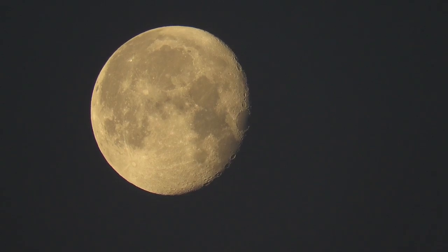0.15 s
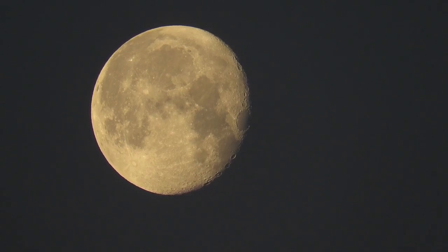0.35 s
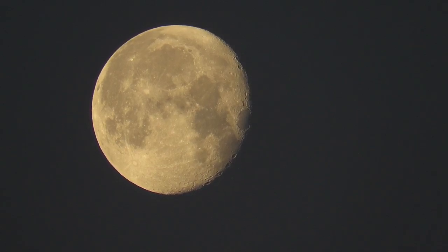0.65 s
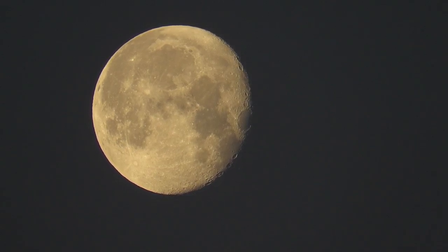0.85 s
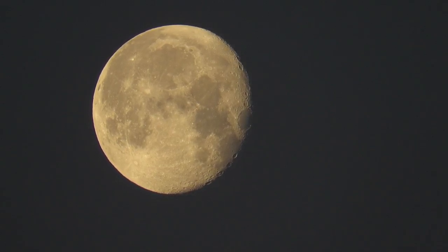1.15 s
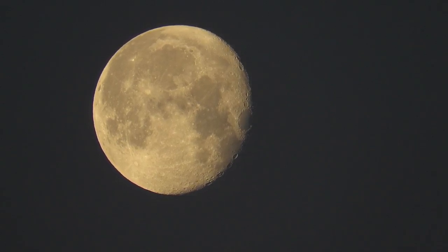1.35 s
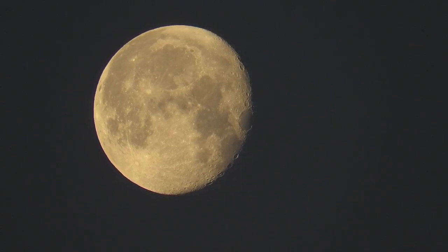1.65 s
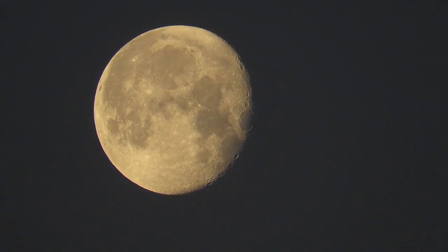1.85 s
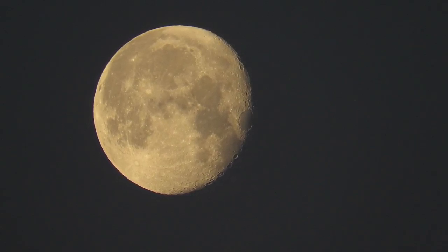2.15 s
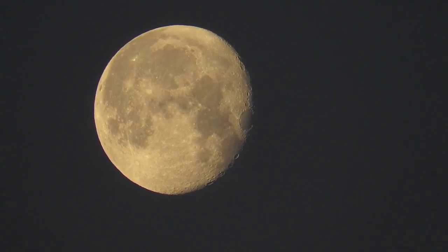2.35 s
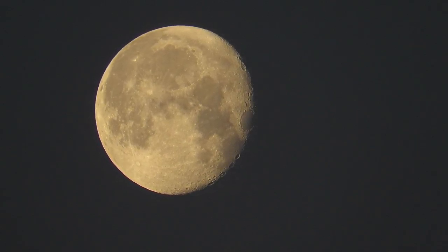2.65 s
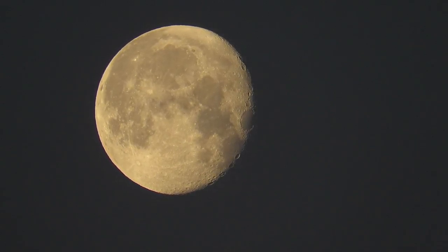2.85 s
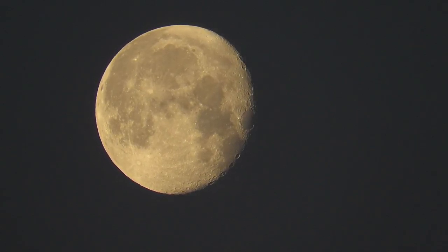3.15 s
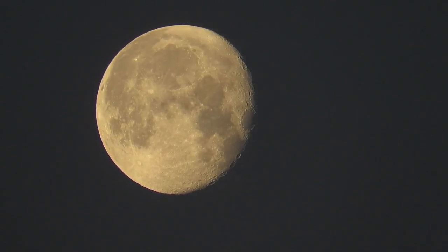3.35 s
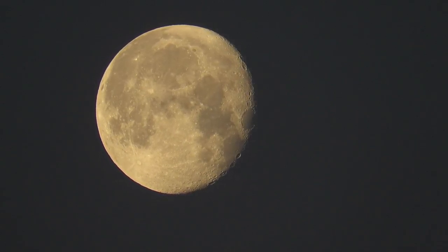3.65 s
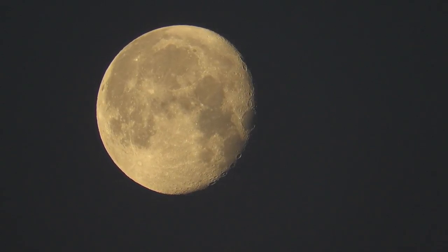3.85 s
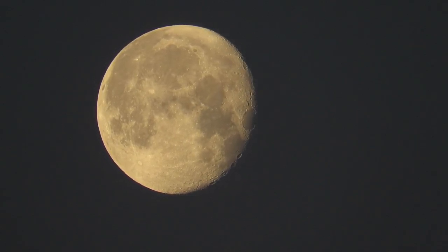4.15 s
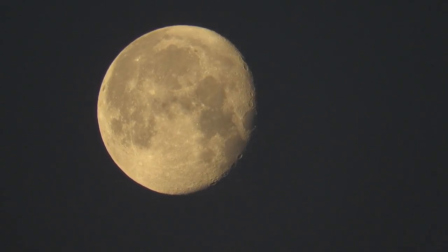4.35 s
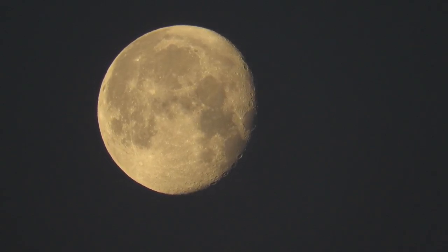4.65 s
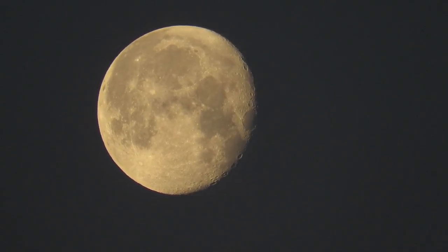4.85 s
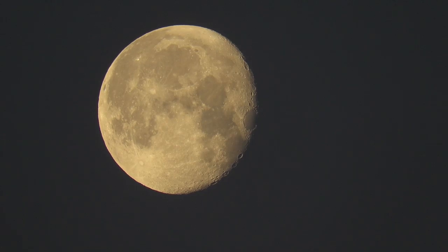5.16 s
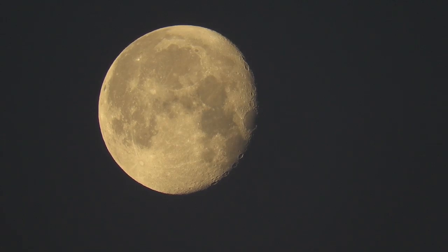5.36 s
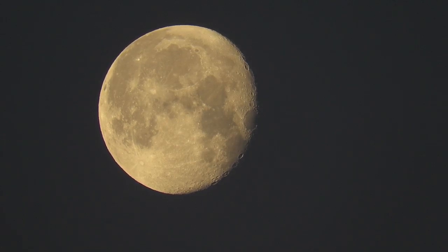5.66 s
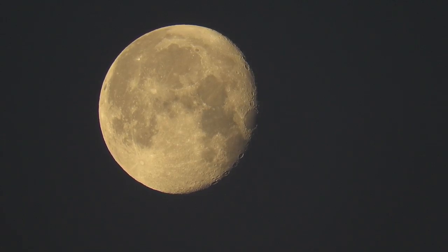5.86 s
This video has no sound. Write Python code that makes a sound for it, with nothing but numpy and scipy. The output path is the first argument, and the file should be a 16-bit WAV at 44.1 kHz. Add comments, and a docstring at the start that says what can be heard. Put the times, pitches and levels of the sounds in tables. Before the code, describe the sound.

A flying gull gives five quick three-note cries, echoed off house fronts along a street, over a steady low town rumble with one faint knock.

```python
"""Above the steady rumble of a town and its humming fans, a gull flies over a street and gives five
three-note cries, each note a stack of gliding overtones. After each cry a house front throws it back,
mostly later, higher and from the other side, and the street rings on with scattered reflections.
Between the fourth and fifth cry comes one distant knock, a short burst of noise.
All is heard through a small stereo microphone and opens after a moment of silence."""
import sys
import numpy as np
from scipy import signal
from scipy.fft import rfft, irfft
from scipy.io import wavfile
from scipy.ndimage import uniform_filter1d

SR = 44100
rng = np.random.default_rng(int(sys.argv[2]) if len(sys.argv) > 2 else 0)


def wrap_up_sound(samples):
    """Save the sound to the file named by the first command line argument, as 16-bit audio."""
    columns = np.atleast_2d(samples).T
    # keep every value between -1 and 1, then stretch to whole-number steps
    tamed = np.clip(columns, -1, 1)
    steps = np.round(tamed * 32767).astype(np.int16)
    wavfile.write(sys.argv[1], SR, steps)


N = 264908
NOTES_PER_CRY = 3

# The notes of the gull's cries, one row a note: kind, start t/s, length t/s, first f/Hz, last f/Hz,
# arch f/Hz, swell and fade of overtone 2 (dB per s),
# then for each of overtones 2, 3, 4: loudest level/dB and its moment (0-1 of the note)
CRY_NOTES = [ ("rise", .672, .048, 1190, 1330, 11, 380, 300, -48, .8, -52.5, .5, -61, .85),
             ("high", .715, .059, 1575, 1465, 10, 550, 150, -43.5, .6, -80, .5, -61, .45),
             ("drop", .772, .066, 1185, 1065, 10, 130, 400, -42.5, .8, -61, .3, -64, .1),
             ("rise", 1.497, .058, 1175, 1320, 25, 200, 500, -47, .85, -45, .15, -67, .15),
             ("high", 1.538, .069, 1530, 1385, 85, 300, 90, -46, .2, -80, .5, -69, .8),
             ("drop", 1.609, .09, 1165, 850, 85, 500, 150, -41, .1, -54, .4, -72, .2),
             ("rise", 2.54, .058, 1190, 1320, 9.5, 500, 500, -46.5, .85, -53, .65, -70, .15),
             ("high", 2.6, .035, 1557, 1455, 5, 400, 400, -57, .5, -84, .5, -66, .5),
             ("drop", 2.645, .058, 1210, 1030, 20, 250, 300, -48.5, .65, -69, .65, -76, .8),
             ("rise", 4.238, .052, 1175, 1335, 11, 400, 700, -46.5, .85, -48.5, .55, -65, .35),
             ("high", 4.284, .06, 1570, 1490, 55, 200, 150, -48, .35, -84, .5, -62, .85),
             ("drop", 4.358, .052, 1135, 990, 10, 200, 450, -39.5, .06, -58, .15, -72, .4),
             ("rise", 5.785, 0.0517, 1195, 1345, 10, 500, 600, -47.5, .82, -59, .5, -68, .7),
             ("high", 5.832, 0.042, 1620, 1510, 5, 200, 600, -56, .8, -84, .5, -69, .2),
             ("drop", 5.878, .034, 1190, 1090, 5, 300, 300, -56, .45, -64, .5, -80, .5), ]


def gain_of(db):
    """Turns decibels into a factor."""
    return 10 ** (np.asarray(db) / 20)


def evened(x):
    """Scales a signal to an average strength (rms) of 1."""
    return x / np.sqrt(np.mean(x ** 2) + 1e-20)


def smoothed_twice(x, size, axis=-1):
    """Takes a running average twice, which leaves only slow changes."""
    return uniform_filter1d(uniform_filter1d(x, size=size, axis=axis), size=size, axis=axis)


def partly_alike(first, other, likeness):
    """Pairs a signal with a second one: likeness 1 is the same, 0 unrelated, below 0 opposed."""
    return np.array([first, likeness * first + np.sqrt(1 - likeness ** 2) * other])


def read(points, hz):
    """Reads a curve between its points, on a log-frequency axis."""
    f, value = np.transpose(points)
    return np.interp(np.log(hz + 1), np.log(f + 1), value)


def add(mix, s, sound):
    """Mixes a sound in at s seconds."""
    part = mix[round(s * SR):][:len(sound)]
    part += sound[:len(part)]


def placed(x, pan_db, lead_s):
    """Makes two channels: the left louder by pan_db and earlier by lead_s."""
    side = np.array([[.5], [-.5]])
    turn = np.exp(2j * np.pi * np.fft.rfftfreq(N, 1 / SR) * lead_s * side)
    return irfft(rfft(x) * turn * gain_of(pan_db * side), N)


def note(t, hz, overtones_db, waver=0.0055, flutter_db=1.3):
    """Adds overtones on one slightly wavering pitch; each flutters in level on its own."""
    wobble = evened(uniform_filter1d(rng.standard_normal(len(t)), size=150))
    turns = np.cumsum(hz * (1 + waver * wobble)) / SR
    noise = rng.standard_normal((len(overtones_db), len(t) + 2000))
    flutter = flutter_db * evened(smoothed_twice(noise, 180))[:, 1000:-1000]
    tone = np.zeros(len(t))
    for k, db in enumerate(overtones_db):
        tone += gain_of(db + flutter[k]) * np.sin(2 * np.pi * (k + 1) * turns)
    return np.sqrt(2) * tone * signal.windows.tukey(len(t), .17)


def gull(notes, flutter_db, low_db, blur_db):
    """Glides each note over a slight arch while its overtones swell and fade; close paths make it flutter."""
    # The voice, by kind of note: overtone 1 against overtone 2 level/dB, overtone 5 against 4 level/dB,
    # loudest moment of overtones 1 and 5 (0-1), skew of the arch (under 1 tops out early)
    voice = {"rise": (-5, -18, .35, 0, .65), "high": (-21, -22, .5, 0, 1.05),
             "drop": (-15.5, -3, 1, .7, 1.2)}
    # Higher overtones swell and fade faster, one value for each of overtones 1 to 5: (factor)
    steeper = [.6, 1, 1.1, 1.4, 1.5]
    out = np.zeros(N)
    for row, chest_db in zip(notes, low_db):
        kind, start, length, first_hz, last_hz, arch_hz, swell, fade, *overtones = row
        first_db, fifth_db, first, fifth, skew = voice[kind]
        (second_db, third_db, fourth_db), moments = overtones[::2], overtones[1::2]
        t = np.arange(0, length, 1 / SR)
        u = t / length
        hz = first_hz + (last_hz - first_hz) * u + arch_hz * np.sin(np.pi * u ** skew)
        tops = [second_db + first_db + chest_db, second_db, third_db, fourth_db, fourth_db + fifth_db]
        levels = []
        for top, moment, k in zip(tops, (first, *moments, fifth), steeper):
            late = t - length * moment  # below 0 while the overtone still swells
            levels.append(top - k * np.maximum(fade * late, -swell * late))
        add(out, start, note(t, hz, levels, flutter_db=flutter_db))
    # nearby roofs blur the edges: sparse reflections that die away
    lag = np.arange(SR // 12) / SR
    hits = rng.random(len(lag)) < .05
    roofs = gain_of(blur_db - 60 * lag / 0.18) * rng.standard_normal(len(lag)) * hits
    return out + signal.oaconvolve(out, roofs)[:N]


def answer(delay_s, fade_db, clumps_db=2.8, uneven_db=2.0):
    """Scatters sparse reflections of uneven size in clumps, mostly shared by both channels."""
    # The street's answer: t/s after the return from the house front, level/dB
    street_curve = [(-.2, -15), (-.1, -10), (-.03, -6.5), (.02, -2), (.2, -3.5), (.7, -16), (1.7, -29)]
    s, db = np.transpose(street_curve)
    t = np.arange(2 * SR) / SR
    size = gain_of(uneven_db * np.minimum(rng.exponential(1, (2, len(t))), 4))
    hits = rng.random((2, len(t))) < 100 / SR  # about 100 reflections per s
    a, b = size * rng.standard_normal((2, len(t))) * hits
    clumps = evened(smoothed_twice(rng.standard_normal(len(t)), 1200))
    taps = partly_alike(a, b, 0.9)
    level = np.interp(t - delay_s, s, db, left=-200)
    taps *= gain_of(level - fade_db * t + clumps_db * clumps)
    return taps / np.sqrt(80)


def street():
    """Sends each cry to walls in its own set of places, so each has its own scattered reflections."""
    # How each cry fills the street: delay of the house front t/s, rising, high and dropping note level/dB,
    # slower fade (dB per s), spread of the returned pitches below the sharpest (factor)
    fill = [(0.2, -52.5, -52.5, -52.5, 5, 1.05), (0.18, -53, -55.5, -52.5, 3, 1.1),
            (0.17, -52.5, -56, -52, 1, 1.4), (0.09, -51.5, -53, -51.5, -2, 1.9),
            (0.13, -59, -62, -60, 0.1, 1.5)]
    # The notes as the walls hear them, one row a note: overtones 1 to 4 level/dB
    shape = [(-14, 0, -12.5, -22), (-21, 0, -51, -22), (-6, 0, -13.5, -27)]
    # Walls behind and ahead of the flying bird, those ahead ring longest: pitch (factor before the
    # spread), extra fade (dB per s, before the spread and the slower fade)
    walls = [(.96, 22), (.99, 14), (1.015, 5), (1.03, 0), (1.04, 0), (1.045, 0), (1.055, 0)]
    # Change along each note as the walls hear it: rising, high, dropping note level/dB
    lean = [4, -1, -6]
    out = np.zeros((2, N))
    sharpest = walls[-1][0]
    for k, (delay_s, *fill_db, slower_db, spread) in enumerate(fill):
        notes = CRY_NOTES[NOTES_PER_CRY * k:][:NOTES_PER_CRY]
        start = notes[0][1]
        for shift, fade_db in walls:
            cry = np.zeros(SR // 4)
            heard = sharpest - spread * (sharpest - shift)
            for row, overtones, db, lean_db in zip(notes, shape, fill_db, lean):
                _, s, length, first_hz, last_hz, arch_hz, *_ = row
                t = np.arange(0, length, 1 / SR)
                glide = np.linspace(first_hz, last_hz, len(t))
                hz = heard * (glide + arch_hz * np.sin(np.pi * t / length))
                levels = np.add.outer(overtones, db + lean_db * (t / length - .5))
                add(cry, s - start, note(t, hz, levels, waver=0.008))
            reflections = answer(delay_s, fade_db / spread - slower_db)
            add(out.T, start, signal.fftconvolve(cry[None], reflections, axes=1).T)
    return out


def knock():
    """Makes a dry crack far off: a short burst of noise and its quickly dying reflections."""
    # Colour of the knock: f/Hz, level/dB (per Hz)
    colour = [(700, -30), (1100, 0), (1560, 3.5), (2600, -5.5), (3600, -4.5), (5400, -14), (6400, -23),
              (7500, -47)]
    start_s, level_db = 4.873, -40
    t = np.arange(SR // 2) / SR
    rise = 1 - np.exp(-t / 0.0036)
    fall = gain_of(-60 * t / 0.091) + gain_of(-10.5 - 60 * t / 0.45)  # the burst, then its reflections
    hz = np.fft.rfftfreq(len(t), 1 / SR)
    spectrum = rfft(rng.standard_normal(len(t))) * gain_of(read(colour, hz))
    burst = evened(irfft(spectrum, len(t)))
    out = np.zeros(N)
    add(out, start_s, gain_of(level_db) * burst * rise * fall)
    return placed(out, 1.0, 1.5e-5)


def town():
    """Shapes noise into traffic and fans: humps and drifting patches, with small quick level changes."""
    # Basic colour of the rumble: f/Hz, level/dB (per Hz, before the whole is scaled)
    rumble = [(15, -45), (30, -45), (60, -11.5), (110, -6), (200, -5), (330, -11.5), (600, -10.5),
              (1250, -13.5), (1500, -18.5), (2200, -24), (3500, -30.5), (6000, -37.5), (10000, -44),
              (13000, -47.5), (15000, -61)]
    # Humps in the rumble: f/Hz, width f/Hz, added level/dB
    hums = [(138.3, 32, 6), (222, 29.7, 6.5), (304, 50, 5), (433, 42, 6), (752, 59, 2.5), (1105, 47, 4)]
    # Passing traffic: t/s, level/dB (only the difference from the mean counts)
    traffic = [(0.0, -50), (0.12, -48.5), (0.23, -48.5), (0.87, -49.5), (1.96, -48), (2.16, -49),
               (4.82, -48), (5.13, -46), (5.74, -47.5), (6.01, -46.5)]
    # How alike left and right are: f/Hz, likeness (-1 to 1)
    alike = [(25, 1), (60, 1), (170, 0.95), (260, 0.5), (400, -0.11), (520, 0.055), (720, 0.77),
             (950, 0.55), (1180, 0.87), (1420, 0.53), (2400, 0.24), (4600, -0.064), (11000, -0.031),
             (14400, -0.36)]
    level_db, hop = -43.5, 512
    frames, hz = N // hop + 5, np.fft.rfftfreq(2048, 1 / SR)
    a, b, c, d, patches = rng.standard_normal((frames, len(hz), 5)).T
    patches = uniform_filter1d(uniform_filter1d(patches, size=16, axis=0), size=4, axis=1)
    patches = evened(patches)
    quick = evened(uniform_filter1d(rng.standard_normal(frames), size=5))
    s, db = np.transpose(traffic)
    swell = np.interp(np.arange(frames) * hop / SR, s, db - db.mean())

    mids = np.exp(-np.log((hz + 1) / 650) ** 2 / 0.75)[:, None]  # passing traffic moves mainly the middle
    patchy = (hz / (hz + 500))[:, None]  # the bass is the steadiest part
    upward = (hz / (hz + 9000))[:, None]  # the quick level changes grow with frequency
    humps = sum(hump_db / (1 + (2 * (hz - f) / width) ** 2) for f, width, hump_db in hums)
    colour = (read(rumble, hz) + humps)[:, None]

    z = partly_alike(a + 1j * b, c + 1j * d, read(alike, hz)[:, None])
    z *= gain_of(colour + mids * swell + 2.16 * patchy * patches + 1.7 * upward * quick)
    lean_db = np.array([.7, -.7])[:, None, None]  # low traffic, around 350 Hz, lies left
    z *= gain_of(lean_db / (1 + ((hz[:, None] - 350) / 150) ** 2))
    noise = signal.istft(z, nperseg=2048, noverlap=2048 - hop)[1][:, :N]
    return gain_of(level_db) * evened(noise)


def fans():
    """Lets tones wander in strength and phase, so each distant fan or plant is a narrow band."""
    # Wavering hums: f/Hz, width f/Hz, level/dB, left-right likeness (0-1)
    fan_tones = [(127.2, 28.6, -54.5, 0.92), (222.2, 13.4, -56.5, 0.75), (449, 20, -66, 0.35),
                 (754.6, 16, -63.5, 0.63), (1227, 10, -67.5, 0.66)]
    out, t = np.zeros((2, N)), np.arange(N) / SR
    for hz, width, db, likeness in fan_tones:
        r = np.exp(-np.pi * width * 1.5 / SR)  # the same smoothing twice over
        noise = rng.standard_normal((2, N)) + 1j * rng.standard_normal((2, N))
        a, b = signal.lfilter([1], np.poly([r, r]), noise)
        pair = partly_alike(a, b, likeness) * np.exp(2j * np.pi * hz * t)
        out += gain_of(db) * evened(pair.real)
    return out


def scene():
    """Sets the bird a little left and the house front right, with rougher returns, over the town."""
    # The notes as the house front and other walls return them; the bird flies towards the house, so
    # they tend to come sooner later on and sound a little sharp. Columns as in CRY_NOTES:
    # kind, start t/s, length t/s, first f/Hz, last f/Hz, arch f/Hz, swell and fade of overtone 2
    # (dB per s), then for each of overtones 2, 3, 4: loudest level/dB and its moment (0-1)
    returned_notes = [ ("high", .83, .07, 1580, 1480, 5, 300, 300, -51, .4, -87, .5, -95, .5),
                      ("rise", .78, .055, 1250, 1290, 5, 200, 300, -57, .7, -63, .4, -80, .5),
                      ("high", .92, .048, 1560, 1510, 5, 200, 200, -52, .5, -85, .5, -76, .5),
                      ("rise", 1.15, .055, 1310, 1320, 10, 400, 350, -54, .25, -65, .3, -80, .5),
                      ("drop", 1.888, .03, 1090, 1050, 5, 400, 400, -54, .5, -69, .5, -80, .5),
                      ("rise", 1.935, .045, 1220, 1340, 10, 300, 300, -59, .7, -63, .3, -80, .5),
                      ("drop", 1.94, .04, 1170, 1070, 10, 300, 300, -54, .7, -70, .5, -80, .5),
                      ("drop", 2.01, .07, 1140, 1100, 10, 250, 250, -56, .7, -68, .5, -80, .5),
                      ("high", 2.695, .03, 1560, 1500, 5, 400, 400, -59, .4, -85, .5, -80, .5),
                      ("high", 2.74, .04, 1570, 1580, 5, 300, 300, -60, .5, -85, .5, -69, .6),
                      ("high", 2.83, .05, 1590, 1490, 10, 300, 200, -57, .3, -85, .5, -76, .5),
                      ("drop", 2.87, .07, 1190, 1150, 30, 400, 150, -53, .2, -68, .5, -80, .5),
                      ("high", 4.52, .03, 1650, 1600, 5, 400, 400, -57, .4, -85, .5, -76, .5),
                      ("high", 4.565, .065, 1590, 1460, 20, 300, 200, -55, .3, -85, .5, -82, .5),
                      ("rise", 4.58, .06, 1250, 1300, 5, 200, 300, -64, .5, -61, .7, -80, .5),
                      ("rise", .922, .042, 1270, 1335, 5.6, 150, 300, -47, .9, -58, .7, -76, .5),
                      ("rise", .965, .04, 1335, 1310, 5, 200, 300, -60, .5, -60, .5, -80, .5),
                      ("high", .96, .06, 1620, 1545, 15, 150, 200, -44, .65, -80, .5, -72, .3),
                      ("drop", 1.012, .065, 1250, 1130, 5, 400, 250, -46, .15, -53, .4, -68, .4),
                      ("drop", 1.095, .03, 1150, 1115, 5.3, 400, 400, -55, .5, -72, .5, -78, .5),
                      ("rise", 1.705, 0.0337, 1280, 1350, 5, 800, 800, -48, .3, -60, .7, -84, .5),
                      ("rise", 1.735, .055, 1250, 1380, 10, 200, 400, -51.5, .6, -72, .5, -90, .5),
                      ("drop", 1.725, .065, 1360, 1290, 5, 300, 150, -66, .5, -59, .3, -90, .5),
                      ("high", 1.737, .088, 1620, 1475, 85, 150, 60, -48.5, .4, -78, .5, -66, .88),
                      ("drop", 1.825, 0.056, 1195, 1120, 10, 100, 150, -52, .6, -59, .45, -72, .7),
                      ("rise", 2.645, 0.076, 1220, 1360, 4.2, 350, 500, -67, .5, -57, .75, -90, .5),
                      ("rise", 2.735, 0.046, 1285, 1345, 10, 350, 600, -52, .75, -53, .4, -76, .4),
                      ("high", 2.785, .047, 1630, 1550, 5, 900, 250, -46.5, .3, -80, .5, -66, .1),
                      ("drop", 2.825, .11, 1240, 1190, 4.7, 100, 100, -52, .4, -64, .1, -79, .5),
                      ("drop", 2.975, 0.064, 1200, 1160, 5, 150, 150, -52, .4, -72, .5, -90, .5),
                      ("drop", 2.812, .05, 1265, 1200, 5, 300, 200, -55, .4, -68, .5, -85, .5),
                      ("rise", 2.885, .06, 1250, 1340, 5, 200, 200, -57, .5, -68, .5, -85, .5),
                      ("drop", 2.9, .045, 1225, 1185, 5, 200, 200, -57, .5, -70, .5, -85, .5),
                      ("drop", 3.14, .13, 1175, 1130, 5, 80, 80, -59, .5, -76, .5, -90, .5),
                      ("rise", 2.955, .1, 1290, 1340, 5, 100, 100, -72, .5, -65, .4, -90, .5),
                      ("drop", 3.06, .08, 1190, 1165, 4.4, 150, 250, -54, .5, -74, .5, -90, .5),
                      ("rise", 4.33, .045, 1400, 1800, 70, 250, 250, -58, .5, -95, .5, -84, .5),
                      ("rise", 4.358, 0.0366, 1215, 1394, 20, 500, 400, -41.5, .8, -52, .45, -61, .9),
                      ("high", 4.395, .04, 1640, 1650, 30, 150, 300, -40, .4, -80, .5, -61, .55),
                      ("high", 4.435, .04, 1640, 1520, 5, 300, 300, -50, .3, -80, .5, -67, .75),
                      ("drop", 4.405, 0.049, 1185, 1065, 10, 300, 150, -51, .3, -64, .7, -90, .5),
                      ("drop", 4.472, .046, 1175, 1060, 10, 400, 250, -49, .25, -58, .3, -74, .5),
                      ("drop", 4.63, .055, 1160, 1060, 5, 200, 200, -58, .4, -72, .5, -85, .5),
                      ("high", 5.955, .045, 1675, 1615, 5, 200, 200, -62, .5, -90, .5, -85, .5), ]
    # Extra strength of the lowest tone, one value for each cry: level/dB
    chest = [0.1, 0.1, 4, 0.1, 0.1]
    wall_loss = np.full(len(returned_notes), -25)  # dB: walls return little of the lowest tone
    cries = gull(CRY_NOTES, flutter_db=1.8, low_db=np.repeat(chest, NOTES_PER_CRY), blur_db=-26)
    returns = gull(returned_notes, flutter_db=3.2, low_db=wall_loss, blur_db=-22)
    bird = placed(cries, .6, 1.2e-5)
    house_front = placed(returns, -.9, -0.000033)
    return bird + house_front + street() + knock() + town() + fans()


def record(dry):
    """Opens the sound after a moment of silence, then cuts off the highest treble."""
    start_s, fade_in_s, edge_hz = 0.0356, 0.014, 15030
    opened = dry * np.clip((np.arange(N) / SR - start_s) / fade_in_s, 0, 1)
    low_pass = signal.firwin(511, edge_hz, window=("kaiser", 9), fs=SR)
    return signal.oaconvolve(opened, low_pass[None], "same")


dry = scene()
out = record(dry)
wrap_up_sound(out)
```